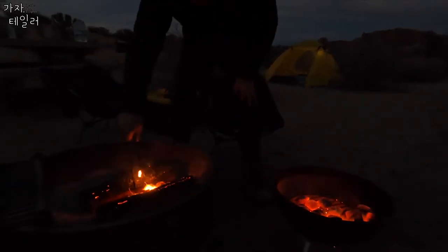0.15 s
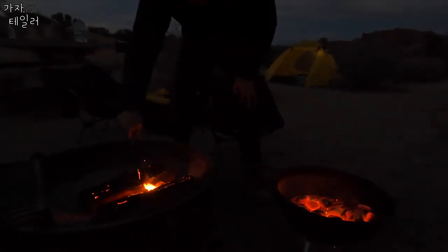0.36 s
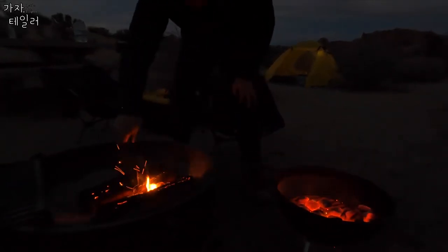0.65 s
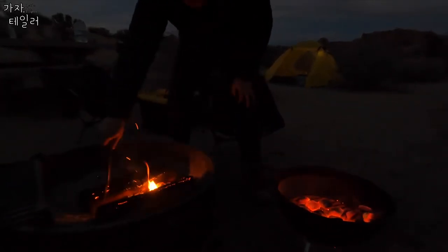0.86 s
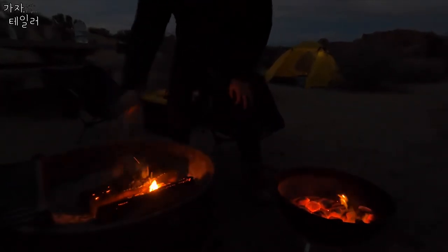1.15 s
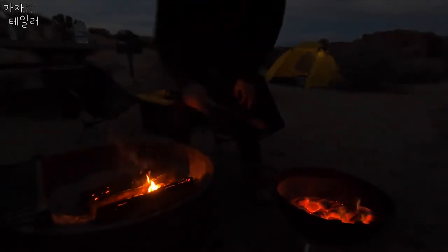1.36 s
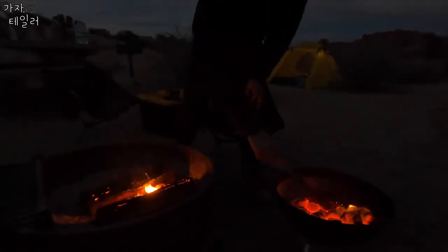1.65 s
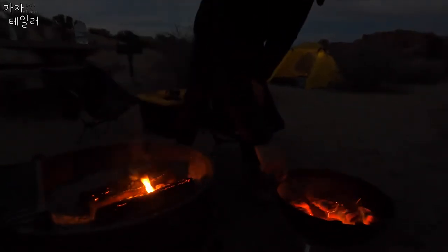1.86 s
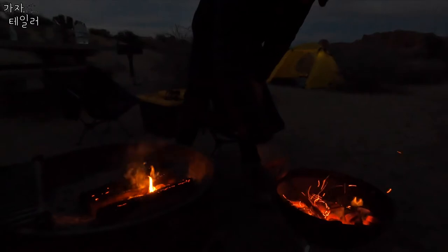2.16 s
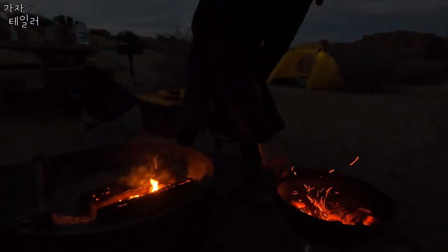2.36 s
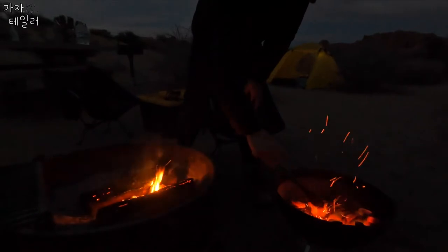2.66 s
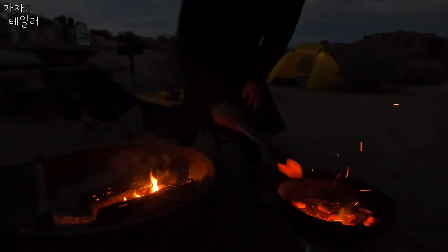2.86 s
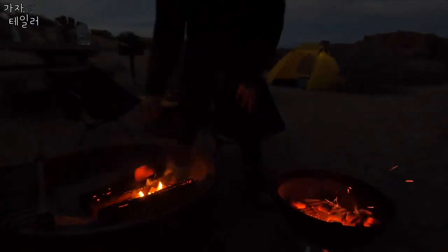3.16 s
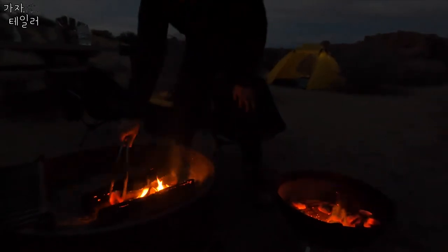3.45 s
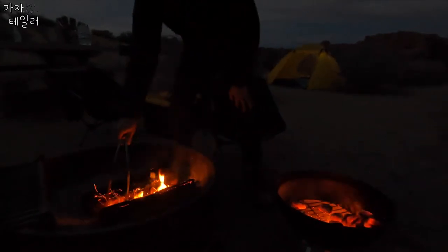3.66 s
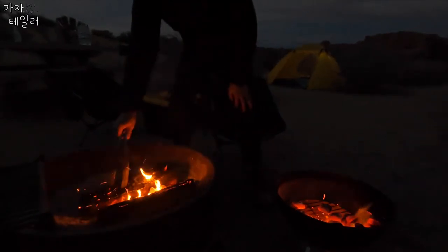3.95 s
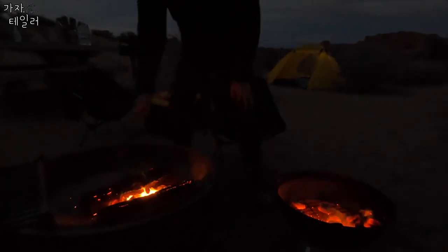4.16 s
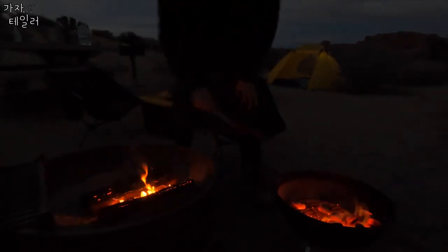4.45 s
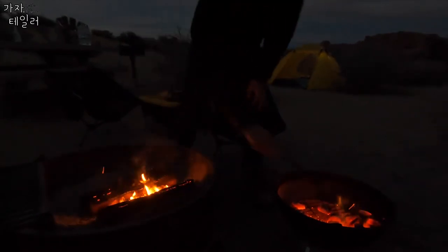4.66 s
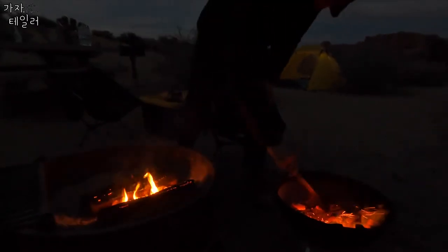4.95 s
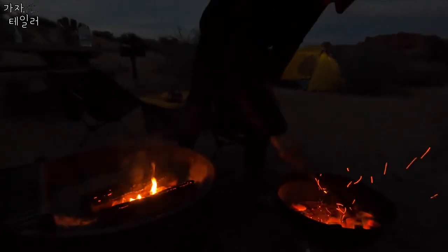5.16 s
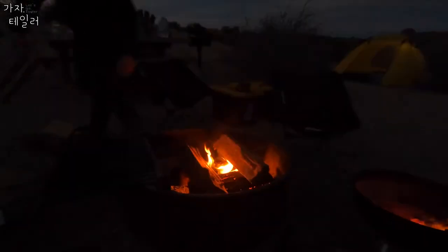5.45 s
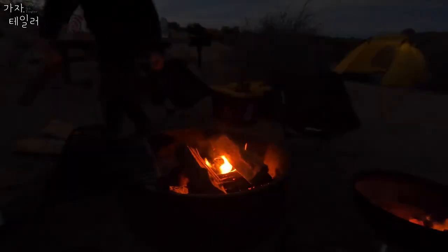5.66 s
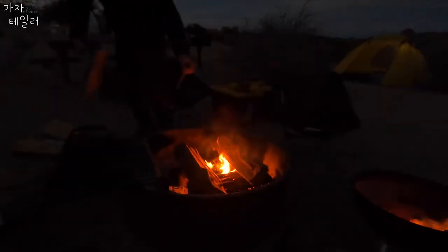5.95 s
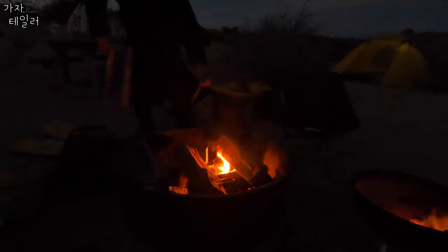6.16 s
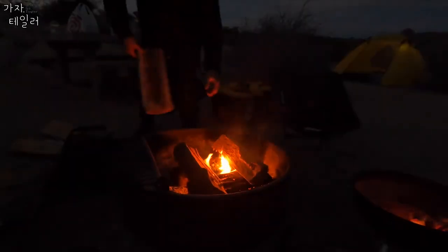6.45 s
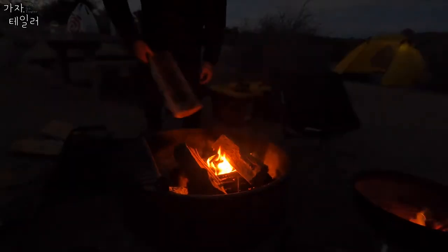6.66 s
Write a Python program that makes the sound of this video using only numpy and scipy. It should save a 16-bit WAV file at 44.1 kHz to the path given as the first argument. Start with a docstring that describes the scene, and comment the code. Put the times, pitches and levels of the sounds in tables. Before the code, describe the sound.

Outdoors at a campsite, tongs rake crisp coals in a fire ring slightly left, then in a steel pan on the right, with glassy clinks, dull knocks and sparse ember pops. A far engine hums low, rising and falling. The loudest clank hits the pan just before five seconds; the engine then fades, logs scrape on gritty ground and wind thumps the close stereo microphone.

```python
"""Raking coals at a camp site

Tongs rake coals in a fire ring on the left and in a steel pan on the right; later logs are dragged.
Noise bursts and decaying sines make clinks, knocks and pops; dense clicks make raking, crackle, grit and logs.
A jacket rustles in swells of noise; a far engine, a sum of sines, revs up, drops, revs again and fades.
Shaped noise makes wind buffets on the microphone, low rumble and faint hiss."""
import sys
import numpy as np
from scipy import signal
from scipy.fft import rfft, irfft, next_fast_len
from scipy.io import wavfile

SR = 44100
rng = np.random.default_rng(int(sys.argv[2]) if len(sys.argv) > 2 else 0)


def wrap_up_sound(samples):
    """Save the sound to the file named by the first command line argument, as 16-bit audio."""
    columns = np.atleast_2d(samples).T
    # keep every value between -1 and 1, then stretch to whole-number steps
    tamed = np.clip(columns, -1, 1)
    steps = np.round(tamed * 32767).astype(np.int16)
    wavfile.write(sys.argv[1], SR, steps)


N = 300762
TIME_S = np.arange(N) / SR
OPPOSITE = np.array([[1], [-1]])  # left, right signs


def amp(db):
    """Gain of a level in dB."""
    return 10 ** (np.asarray(db) / 20)


def rms_one(x):
    """Scaled to rms 1."""
    return x / np.sqrt(np.mean(x ** 2) + 1e-20)


def in_time(rows):
    """Columns of a curve, sample by sample."""
    s, *columns = np.transpose(rows)
    return [np.interp(TIME_S, s, column) for column in columns]


def at_hz(points, hz):
    """A spectrum read on a log-frequency axis."""
    point_hz, value = np.transpose(points)
    return np.interp(np.log(hz), np.log(point_hz), value)


def bins_hz(size):
    """FFT bin frequencies, kept above 0 for the log axis."""
    return np.maximum(np.arange(size // 2 + 1) * SR / size, 1)


def drift(rate_hz):
    """Slow random signal of rms 1: noise through two equal poles, made at 1/40 of the sample rate."""
    r = np.exp(-80 * np.pi * rate_hz / SR)
    noise = rng.standard_normal(N // 40 + 2002)
    slow = signal.lfilter([1], [1, -2 * r, r * r], noise)[2000:]  # drop the settling
    return np.interp(np.arange(N) / 40, np.arange(len(slow)), rms_one(slow))


def colour(x, spectrum):
    """Gives x a spectrum, steeply closed at both ends; rms 1."""
    size = next_fast_len(N)
    hz = bins_hz(size)
    low_hz, high_hz = spectrum[0][0], spectrum[-1][0]
    edges = 1 / np.sqrt((1 + (low_hz / hz) ** 8) * (1 + (hz / high_hz) ** 8))
    shaped = rfft(x, size) * amp(at_hz(spectrum, hz)) * edges
    return rms_one(irfft(shaped, size)[..., :N])


# Diffuse sound. Each row: frequency in Hz, left-right likeness (0 to 1).
LIKENESS = [(25, 0.26), (100, 0.8), (300, 0.21), (1000, 0.17), (4000, 0.093), (12000, 0.74)]


def diffuse(spectrum, flicker_db, rate_hz):
    """Stereo noise with a left-right likeness set by frequency and a flickering level; rms 1."""
    size = next_fast_len(N)
    alike = np.clip(at_hz(LIKENESS, bins_hz(size)), 0, 1)
    mid, side = rfft(rng.standard_normal((2, size)))
    both = np.sqrt(1 + alike) * mid + np.sqrt(1 - alike) * side * OPPOSITE
    noise = colour(irfft(both, size)[:, :N], spectrum)
    return rms_one(noise * amp(flicker_db * drift(rate_hz)))


def grains(per_s, spread_db, clump_db, clump_rate_hz):
    """Random clicks of uneven size that come in clumps."""
    size_db = spread_db * np.minimum(rng.exponential(1, N), 4)
    clicks = amp(size_db) * rng.choice([-1, 1], N) * (rng.random(N) < per_s / SR)
    return clicks * amp(clump_db * drift(clump_rate_hz)) + 1e-18


def ring(clicks, hz, t60_s):
    """Two-pole resonator: a unit click sets a sine of height 1 ringing."""
    r, w = amp(-60 / (t60_s * SR)), 2 * np.pi * hz / SR
    return signal.lfilter([0, np.sin(w)], [1, -2 * r * np.cos(w), r * r], clicks + 1e-18)


def pan(left_minus_right_db):
    """Left and right gains, as a column, for a level difference."""
    return amp(left_minus_right_db / 2 * OPPOSITE)


def swells(rows, rise_power, fall_power):
    """Gain of gestures that grow to their loudest moment and die away; higher powers are more pointed."""
    out = np.zeros(N)
    for start, loudest, end, db in rows:
        span = np.arange(max(round(start * SR), 0), min(round(end * SR), N))
        shape = np.interp(span / SR, [start, loudest, end], [0, 1, 0])
        out[span] += amp(db) * shape ** np.where(span / SR < loudest, rise_power, fall_power)
    return out


PAN_SHADE_HZ = 9670


def shaded(x):
    """The pan's wall hides the top treble of what happens inside it: a low-pass."""
    return signal.sosfilt(signal.butter(2, PAN_SHADE_HZ, fs=SR, output="sos"), x)


# Tongs work in the pan. Each row: from in seconds, to in seconds.
IN_PAN = [(1.8, 2.74), (4.8, 5.45)]


def place_db(s, ring_db, pan_db):
    """Left-right difference of what the tongs do at time s: in the fire ring or in the pan."""
    return pan_db if any(first < s < last for first, last in IN_PAN) else ring_db


# Tongs raking through coals. Each row: start, loudest and end in seconds, level in dB.
RAKES = [(0.0, 0.056, 0.15, -48.5), (0.24, 0.444, 0.42, -55), (0.643, 0.74, 0.81, -41.5),
         (1.043, 1.062, 1.155, -52.5), (1.844, 1.854, 1.94, -48.5), (1.926, 2.05, 2.035, -41),
         (2.045, 2.115, 2.18, -53.5), (2.2, 2.228, 2.46, -49), (2.58, 2.677, 2.676, -49),
         (3.49, 3.662, 3.82, -59.5), (4.889, 4.89, 5.03, -33.5), (5.013, 5.022, 5.07, -40),
         (5.047, 5.076, 5.15, -44)]
# Brittle coal. Each row: frequency in Hz, relative density in dB.
COAL = [(880, -10.5), (1500, -25.5), (2810, -20), (3070, -14), (4320, -15), (5570, -1.5), (5910, -6),
        (6840, -2), (12300, -4), (14400, -12), (15600, -41)]
# Modes of tongs and pan. Each row: frequency in Hz, weight in dB (halved in use), longest t60 in seconds.
STEEL = [(1060, -22, 0.41), (2170, -8, 0.45), (2470, -50, 0.34), (2995, -16, 0.18), (4060, -32, 0.35),
         (4720, -31, 0.05), (4620, -33, 0.15), (5390, -23, 0.073), (6000, -30, 0.026), (6930, -33, 0.03),
         (6100, -20, 0.096), (7065, 2.5, 0.02), (7300, -38, 0.12), (7720, -16.5, 0.04), (10500, -1, 0.013),
         (9500, -53, 0.048), (10830, -12, 0.05), (11700, 0, 0.057)]


def raking():
    """Dense contacts: brittle coal chips tinkle at scattered pitches; in the pan the steel rings along."""
    contacts = grains(3500, spread_db=3.5, clump_db=2, clump_rate_hz=60)
    pitches_hz, dealt = np.geomspace(1500, 14000, 48), rng.integers(0, 48, N)
    chips = sum(ring(contacts * (dealt == k), hz, 90 / hz) for k, hz in enumerate(pitches_hz))
    crunch = rms_one(colour(contacts, COAL) + amp(4) * colour(chips, COAL))
    steel = np.zeros(N)
    for hz, db, t60_s in STEEL:
        wavering = amp(0.5 * db + 4 * drift(5.6))
        steel += wavering * ring(contacts * rng.standard_normal(N), hz, 0.26 * t60_s)  # damped by contact
    in_pan = shaded(crunch + amp(-7) * colour(steel, COAL))
    out = np.zeros((2, N))
    for stroke in RAKES:
        pan_db = place_db(stroke[1], ring_db=5.9, pan_db=-10.5)
        sound = in_pan if pan_db < 0 else crunch
        out += swells([stroke], rise_power=0.88, fall_power=1.55) * pan(pan_db) * sound
    return out


# Wind buffeting. Each row: time in seconds, level in dB.
WIND = [(0.0, -31), (0.28, -45.5), (0.42, -33), (0.72, -41.5), (0.83, -29), (1.08, -48.5), (1.86, -42),
        (2.1, -46.5), (2.68, -41), (2.94, -53.5), (3.34, -35.5), (3.97, -50.5), (4.63, -44.5), (4.92, -38),
        (5.28, -41), (5.36, -26.5), (5.5, -44), (5.65, -41.5), (5.72, -29.5), (5.92, -23.5), (5.98, -30),
        (6.15, -32), (6.35, -32), (6.4, -18), (6.45, -28.5), (6.5, -17), (6.55, -30.5), (6.82, -48.5)]
# Flame and air rumble. Each row: time in seconds, level in dB.
RUMBLE_LEVEL = [(0.0, -50), (0.83, -49.5), (2.2, -43.5), (2.68, -47), (2.96, -42), (3.34, -49), (4.63, -50),
                (5.0, -44.5), (5.28, -47.5), (5.62, -43.5), (5.98, -55.5), (6.35, -43.5), (6.41, -41),
                (6.5, -49.5), (6.6, -51.5), (6.82, -50.5)]
# Light buffeting, gusty buffeting, rumble, hiss. Each row: frequency in Hz, relative density in dB.
BREEZE = [(15, -1.5), (33, 3), (48, -7), (90, -16), (200, -35.5)]
BUFFET = [(8.8, -5), (15, 0), (32, 5.5), (50, -1), (83, -7), (161, -26), (200, -35), (260, -61),
          (440, -120)]
RUMBLE = [(29, -39.5), (50, -0.5), (62, -4), (70, -13), (151, -6.5), (285, -17), (339, -24.5), (800, -43),
          (1040, -38.5), (1760, -120)]
HISS = [(240, -16), (400, -22), (847, -4), (1400, 3.5), (2590, -23), (5500, -6), (7320, 2.5), (8670, -6.5),
        (12300, -2), (13900, -9), (15500, -50)]
HISS_DB, GUSTS_FROM_S, GUST_FADE_S = -69.5, 5.3, 0.094


def air():
    """Wind lumps on the microphone, fuller once it gusts; low rumble, faint hiss."""
    (buffet_db,), (rumble_db,) = in_time(WIND), in_time(RUMBLE_LEVEL)
    gusty = np.clip((TIME_S - GUSTS_FROM_S) / GUST_FADE_S, 0, 1)
    buffet = (1 - gusty) * diffuse(BREEZE, flicker_db=3, rate_hz=4.2)
    buffet += gusty * diffuse(BUFFET, flicker_db=1.5, rate_hz=4)
    low = amp(buffet_db) * buffet + amp(rumble_db) * diffuse(RUMBLE, flicker_db=2.5, rate_hz=14)
    return low * pan(-2.3) + amp(HISS_DB) * diffuse(HISS, flicker_db=1.5, rate_hz=3)


# Far engine. Each row: time in seconds, firing rate in Hz, level in dB.
ENGINE = [(0.0, 53.7, -37), (1.29, 66.18, -47), (1.49, 69.1, -38.5), (1.64, 71, -49.5), (2.2, 82.05, -47),
          (2.33, 81.65, -55), (2.5, 82.9, -46.5), (2.78, 80, -51.5), (2.92, 80.6, -47), (3.29, 72.4, -44.5),
          (3.58, 65.4, -37.5), (3.8, 48.7, -67), (3.9, 49.17, -44.5), (4.52, 48.2, -60), (4.8, 63.2, -49.5),
          (5.19, 59.9, -44.5), (5.25, 59, -69)]
# Each row: multiple of the firing rate, relative level in dB.
ENGINE_ORDERS = [(1, -1.2), (2, -12.5), (3, -26.5), (4, -24)]
ENGINE_FADE_S = 0.086


def engine():
    """Low orders of the firing rate, each wavering on its way through the air."""
    hz, level_db = in_time(ENGINE)
    fade = np.clip((ENGINE[-1][0] - TIME_S) / ENGINE_FADE_S, 0, 1)
    phase = 2 * np.pi * np.cumsum(hz) / SR
    orders = np.zeros((2, N))
    for k, db in ENGINE_ORDERS:
        waver = 1.24 * drift(1.5) + 0.22 * drift(1.7) * OPPOSITE  # radians, partly opposite left and right
        orders += amp(db + 2.5 * drift(2.5)) * np.sin(k * phase + waver)
    return np.sqrt(2) * amp(level_db) * fade * orders * pan(-1.2)


def crackle():
    """Tiny pops of the embers, most of them from the fire on the left."""
    left = grains(12, spread_db=3, clump_db=2, clump_rate_hz=3)
    right = grains(5, spread_db=3, clump_db=2, clump_rate_hz=3)
    return amp(-79) * colour(pan(5) * left + pan(-3) * right, COAL)


# Boots grinding on grit. Each row: start, loudest and end in seconds, level in dB.
SCUFFS = [(1.05, 1.5, 5.2, -67.5), (1.7, 1.92, 2.3, -61), (2.5, 3.08, 3.6, -74), (3.15, 3.38, 4.1, -68),
          (3.55, 3.75, 7.1, -74), (3.9, 4.14, 4.4, -65), (4.45, 4.8, 4.96, -56.5),
          (4.86, 4.98, 5.15, -50.5), (5.6, 5.7, 5.76, -40.5), (5.72, 5.85, 6.03, -51.5),
          (5.85, 6.02, 6.33, -63.5), (6.19, 6.39, 6.44, -47.5), (6.36, 6.6, 6.96, -59.5)]
# Jacket and sliding ash. Each row: start, loudest and end in seconds, level in dB.
RUSTLES = [(1.02, 1.18, 1.46, -59), (1.45, 1.52, 2.03, -59), (1.92, 2.12, 3.06, -65),
           (2.8, 3.04, 3.23, -57), (3.2, 3.5, 3.78, -64.5), (4.08, 4.22, 4.46, -59.5),
           (4.5, 4.8, 4.93, -55.5), (5.0, 5.07, 5.155, -44.5), (5.15, 5.38, 5.6, -67.5),
           (5.5, 5.66, 5.87, -43.5), (5.7, 5.83, 6.15, -58), (6.38, 6.6, 6.9, -64)]
# Grit, then jacket cloth. Each row: frequency in Hz, relative density in dB.
GRIT = [(290, -56), (500, -2), (623, 2), (856, -7), (1020, 7), (1320, 10.5), (2550, -4.5), (3500, -18),
        (4550, -14), (7700, -120)]
JACKET = [(1350, 2), (2300, 3.5), (3980, 2), (4590, 1), (5710, 4), (7760, -3.5), (13300, -14.5),
          (14700, -31), (15000, -64)]
STILL_GRIT_DB, STILL_JACKET_DB = -82.5, -75.5  # floor under the movements


def person():
    """Grit grinds in fine grains under the boots; jacket and sliding ash swish smoothly."""
    grit = colour(grains(1800, spread_db=4, clump_db=2, clump_rate_hz=25), GRIT)
    grit_gain = amp(STILL_GRIT_DB) + swells(SCUFFS, rise_power=1.7, fall_power=1.85)
    jacket_gain = amp(STILL_JACKET_DB) + swells(RUSTLES, rise_power=0.73, fall_power=1)
    jacket = jacket_gain * diffuse(JACKET, flicker_db=1.5, rate_hz=18)
    return grit_gain * grit * pan(-0.4) + jacket


HOLD_SHARE = 0.032  # a blow grinds on for this share of its t60 before it dies
ASH_DB = -3  # steel buried in the ash of the fire ring rings less
STRAY_DB = -4  # part of each burst that is opposite left and right
INSIDE_BELOW_DB = -2.5  # blows panned further right than this sound inside the pan


def blows(rows, noise_db, chips_db, steel_db, octaves, held, order):
    """Each blow: a swelling, dying noise burst, a few rings of the lump's own, and the steel modes nearby."""
    out = np.zeros((2, N + SR))
    hz, mode_db, mode_t60_s = np.array(STEEL).T[:, :, None]
    for s, level_db, centre_hz, rise_ms, t60_s, pan_db in rows:
        inside, rise_s = pan_db < INSIDE_BELOW_DB, rise_ms / 1000
        length_s = rise_s + (4 if inside else 1.5) * held * t60_s
        t = np.arange(round(length_s * SR)) / SR
        after = np.maximum(t - rise_s - HOLD_SHARE * t60_s, 0)

        band_hz = np.clip(centre_hz * 2.0 ** np.array([-1.3 * octaves, 0.99 * octaves]), 50, 0.45 * SR)
        bandpass = signal.butter(order, band_hz, "band", fs=SR, output="sos")
        burst, stray = signal.sosfilt(bandpass, rng.standard_normal((2, len(t))))
        burst = burst + amp(STRAY_DB) * stray * OPPOSITE

        own_hz = np.minimum(centre_hz * 2 ** rng.normal(0, 0.76 * octaves, (6, 1)), 0.4 * SR)
        chips = np.sin(2 * np.pi * (own_hz * t + rng.random((6, 1)))).sum(0)

        near_db = -6 * (np.log2(hz / centre_hz) / octaves) ** 2 + rng.normal(0, 4, hz.shape)
        # a brief pop barely stirs the steel; the pan rings longer than the tongs buried in ash
        rings_s = np.minimum(mode_t60_s, (3.5 if inside else 1) * held * t60_s)
        modes = np.sin(2 * np.pi * (hz * t + rng.random(hz.shape)))
        steel = (amp(0.5 * mode_db + near_db - 60 * after / rings_s) * modes).sum(0)

        lump = amp(noise_db) * rms_one(burst) + amp(chips_db) * chips
        blow = amp(-60 * after / t60_s) * lump + amp(steel_db + (0 if inside else ASH_DB)) * steel
        blow *= np.minimum(t / rise_s, 1) ** 2
        at = round(s * SR)
        out[:, at:at + len(t)] += amp(level_db) * pan(pan_db) * (shaded(blow) if inside else blow)
    return out[:, :N]


# Coal and tong clinks. Each row: time in seconds, level in dB, centre in Hz, rise in ms, t60 in seconds.
CLINKS = [(0.0322, -39, 7300, 1.6, 0.093), (0.0663, -33, 7590, 4.5, 0.053), (0.0873, -40.5, 6830, 5, 0.061),
          (0.2809, -27.5, 11240, 0.32, 0.04), (0.3553, -36, 7230, 0.82, 0.055),
          (0.397, -41, 8570, 5.3, 0.028), (0.6478, -31.5, 11600, 1.7, 0.051), (0.693, -34, 7600, 6.1, 0.09),
          (0.7355, -30, 7660, 5.7, 0.089), (1.084, -37, 7280, 2.3, 0.028), (1.272, -28, 6980, 0.62, 0.036),
          (1.855, -47, 5700, 4.1, 0.034), (1.8945, -33, 4497, 4.9, 0.05), (1.91, -35, 4520, 5.4, 0.052),
          (1.977, -49, 5300, 1.8, 0.06), (2.012, -30.5, 6000, 7, 0.077), (2.0286, -25, 6410, 3.7, 0.061),
          (2.2146, -46, 6980, 0.54, 0.017), (2.2568, -39, 6130, 3, 0.034), (2.3839, -44, 7640, 1.3, 0.048),
          (2.5295, -43.5, 5510, 2.7, 0.032), (2.6197, -39, 6240, 0.89, 0.037),
          (2.6609, -43, 6260, 6.93, 0.1), (3.5225, -37.5, 6860, 0.55, 0.12),
          (3.6179, -42, 7850, 2.73, 0.097), (3.9042, -27, 8830, 4.8, 0.061),
          (4.0777, -27.5, 7700, 1.78, 0.048), (4.1567, -45.5, 7310, 1.2, 0.025),
          (4.228, -48.5, 7400, 3, 0.04), (4.3, -48.5, 7600, 3.5, 0.06), (4.8899, -14, 5410, 1.3, 0.084),
          (4.951, -24.5, 5060, 11, 0.039), (5.017, -39, 5800, 1.5, 0.02), (5.028, -16.5, 4710, 2.2, 0.022),
          (5.1019, -30, 6880, 2.1, 0.07), (5.347, -35.5, 6660, 1.7, 0.034), (5.388, -49, 5410, 1.4, 0.071),
          (5.5695, -37, 4140, 21, 0.02), (5.6124, -39, 3290, 11, 0.031), (5.864, -37.5, 3430, 2.9, 0.026)]
# Ember pops from either fire. Each row: time in seconds, level in dB, centre in Hz, left minus right in dB.
POPS = [(0.2125, -51.5, 9500, 8), (0.437, -42, 8600, 6), (0.4845, -58, 9500, 5), (0.5736, -51, 9230, 12),
        (0.835, -53, 8000, 8), (0.9027, -39.5, 7840, 3), (1.0233, -43, 5600, 12), (1.073, -51, 7440, 10),
        (1.4322, -44.5, 8920, 14), (2.169, -45, 6640, 5), (2.231, -31.5, 7000, -8),
        (2.4905, -37.5, 11060, 6), (2.7757, -44, 7930, 6), (3.1591, -28, 10980, 8),
        (3.4796, -40.5, 4460, -2), (3.5976, -35.5, 9440, 5), (3.6432, -44, 8560, 17), (3.785, -47, 8400, 5),
        (3.8287, -47, 10750, 6), (3.9835, -28.5, 9300, 3), (4.3306, -43, 3530, -4.5),
        (4.5639, -37.5, 9540, 7), (4.6368, -33.5, 10100, 7), (4.8597, -32, 6080, -8),
        (5.135, -24.5, 11120, 5), (5.187, -37, 9100, 3), (6.4435, -48, 4070, 13), (6.463, -44.5, 4210, 1),
        (6.5501, -29.5, 5700, 2), (6.5813, -40.5, 8110, 4), (6.643, -47, 8150, 6), (6.68, -47.5, 5000, 5),
        (6.7734, -45.5, 3130, 5)]
# Duller knocks of coal lumps and gravel. Each row: time in seconds, level in dB, centre in Hz.
KNOCKS = [(0.275, -33.5, 470), (0.655, -43, 442), (1.021, -38.5, 1270), (1.465, -45.5, 2470),
          (1.5, -44.5, 2340), (1.548, -45, 1520), (1.893, -25.5, 2300), (1.989, -40, 1494),
          (2.03, -37.5, 1926), (2.06, -50, 1060), (2.289, -36.5, 2096), (2.455, -48, 536),
          (2.528, -46, 1980), (3.216, -34, 1286), (3.372, -47, 1269), (3.477, -52, 450), (3.635, -33, 974),
          (3.683, -39.5, 507), (3.841, -48.5, 1670), (3.879, -49, 1370), (3.909, -35.5, 2485),
          (3.96, -48, 2210), (4.041, -49, 1875), (4.076, -37.5, 527), (4.184, -45, 1319),
          (4.33, -38.5, 1187), (4.346, -45, 1074), (4.418, -49, 1060), (4.957, -25, 2350),
          (5.029, -24.5, 2263), (5.108, -37.5, 1459), (5.369, -39.5, 500), (5.5, -34.5, 1090),
          (5.765, -31.5, 1410), (5.868, -31.5, 1300), (6.164, -49, 1497), (6.61, -42, 1460),
          (6.772, -42, 1410)]
POP_RISE_MS, POP_T60_S = 1, 0.0066
KNOCK_RISE_MS, KNOCK_T60_S = 1.25, 0.059


def hits():
    """Clinks, pops and knocks, each with its rise, ring and place."""
    bright = [(*clink, place_db(clink[0], ring_db=4.7, pan_db=-3.5)) for clink in CLINKS]
    bright += [(s, db, hz, POP_RISE_MS, POP_T60_S, pan_db) for s, db, hz, pan_db in POPS]
    dull = [(s, db, hz, KNOCK_RISE_MS, KNOCK_T60_S, place_db(s, ring_db=0.004, pan_db=-4))
            for s, db, hz in KNOCKS]
    clinks = blows(bright, noise_db=-5, chips_db=-12, steel_db=-8, octaves=0.6, held=1.1, order=2)
    knocks = blows(dull, noise_db=-9.5, chips_db=-16.5, steel_db=-24.5, octaves=0.38, held=1.7, order=1)
    return clinks + knocks


# Each row: time in seconds, level in dB, dull thud of the coal relative to that level in dB.
PAN_BLOWS = [(1.897, -42.5, 18.5), (1.978, -30, -1), (2.262, -27.5, 5), (2.611, -48.5, 10),
             (4.893, -15, 1.5), (5.036, -30.5, 2), (5.609, -30, 7.5), (5.83, -41.5, 13), (6.678, -43, 2)]
# Bowl modes. Each row: frequency in Hz, relative level in dB, t60 in seconds.
PAN_BODY = [(227, 1, 0.061), (410.5, 0, 0.081)]
# Rim singing under the tongs. Each row: start, loudest and end in seconds, level in dB.
RIM = [(2.0, 2.12, 2.21, -70), (2.235, 2.275, 2.363, -42), (2.28, 2.38, 2.67, -70)]
RIM_HZ, THUD_T60_S = 2164, 0.084


def steel_pan():
    """Low thumps of the bowl, and the rim mode kept singing by the rubbing tongs."""
    clicks, thuds, t = np.zeros(N), np.zeros(N), np.arange(2000) / SR
    for s, level_db, thud_db in PAN_BLOWS:
        at = round(s * SR)
        clicks[at] = amp(level_db - 9)
        decay = amp(level_db + thud_db - 60 * t / THUD_T60_S)
        thuds[at:at + len(t)] += decay * rng.standard_normal(len(t))
    bowl = sum(amp(db) * ring(clicks, hz, t60_s) for hz, db, t60_s in PAN_BODY)
    bowl += signal.sosfilt(signal.butter(2, [200, 750], "band", fs=SR, output="sos"), thuds)
    rim_phase = 2 * np.pi * RIM_HZ * TIME_S + 0.57 * drift(11)
    rim = np.sqrt(2) * amp(3 * drift(25)) * np.sin(rim_phase)
    return (bowl + swells(RIM, rise_power=0.88, fall_power=2.1) * rim) * pan(-2.7)


# Logs dragged over the ground. Each row: start, loudest and end in seconds, grind in dB, sand in dB.
DRAGS = [(5.495, 5.51, 5.75, -43, -41), (5.553, 5.614, 5.84, -34.5, -45.5),
         (6.182, 6.201, 6.44, -45.5, -60), (6.217, 6.402, 6.46, -47.5, -73)]
# Grinding log. Each row: frequency in Hz, relative density in dB.
LOG = [(150, -28.5), (250, -2), (348, -17), (429, -2), (605, 1.5), (668, 3.5), (815, -5.5), (1030, 5),
       (3500, -19), (4550, -49), (7700, -120)]


def dragging():
    """Bark slipping over gravel: a lumpy grind with a treble of sand, which shares the jacket's spectrum."""
    slips = grains(4400, spread_db=1.5, clump_db=3.2, clump_rate_hz=40)
    grind_gain = swells([pull[:4] for pull in DRAGS], rise_power=1.2, fall_power=1.93)
    sand_gain = swells([(*pull[:3], pull[4]) for pull in DRAGS], rise_power=0.6, fall_power=1.84)
    return (grind_gain * colour(slips, LOG) + sand_gain * colour(slips, JACKET)) * pan(-1.7)


def scene():
    """Everything around the two fires; the ground returns one short dull echo, left and right swapped."""
    near = hits() + raking() + crackle() + steel_pan()
    delayed = np.roll(near[::-1], round(0.004 * SR), axis=1)
    echo = signal.lfilter([0.4], [1, -0.6], delayed)
    return near + amp(-16) * echo + dragging() + person() + engine() + air()


# Side gain of the microphone pair. Each row: frequency in Hz, gain in dB.
WIDTH = [(300, -5), (1000, 0), (2500, -3.5), (7000, -8.5), (13000, -1)]
STOPBAND_HZ, STOPBAND_DB = 15725, 70


def record(dry):
    """The microphone pair's left-right separation varies with frequency; the top is cut."""
    size = next_fast_len(N)
    mid, side = (dry[0] + dry[1]) / 2, (dry[0] - dry[1]) / 2
    side = irfft(rfft(side, size) * amp(at_hz(WIDTH, bins_hz(size))), size)[:N]
    wide = mid + side * OPPOSITE
    return signal.sosfilt(signal.cheby2(12, STOPBAND_DB, STOPBAND_HZ, fs=SR, output="sos"), wide)


dry = scene()
out = record(dry)
wrap_up_sound(out)
```